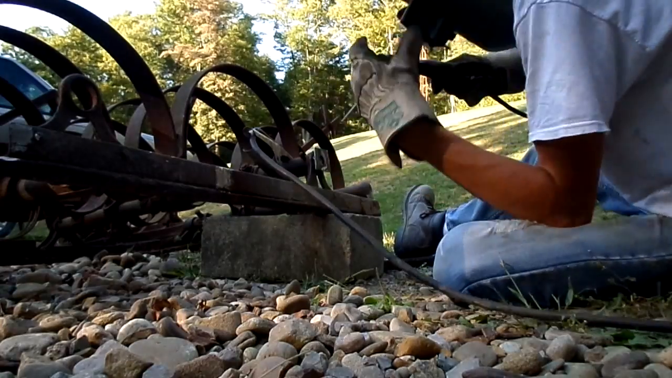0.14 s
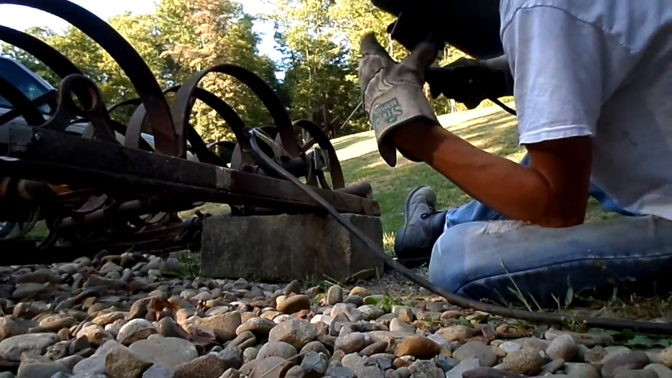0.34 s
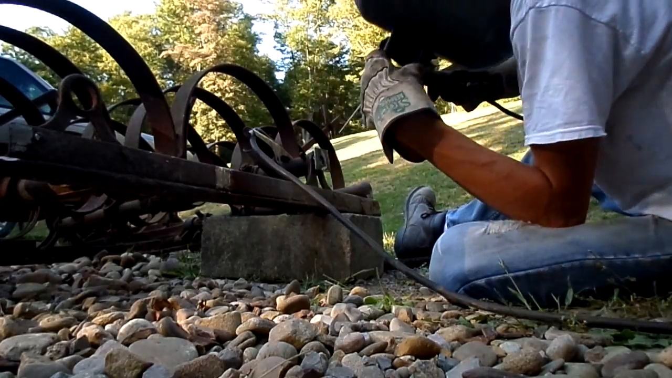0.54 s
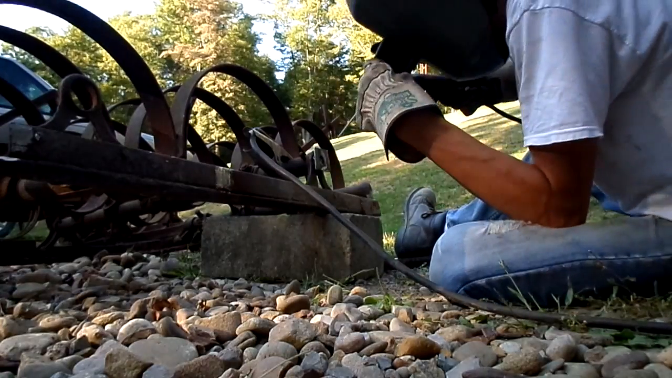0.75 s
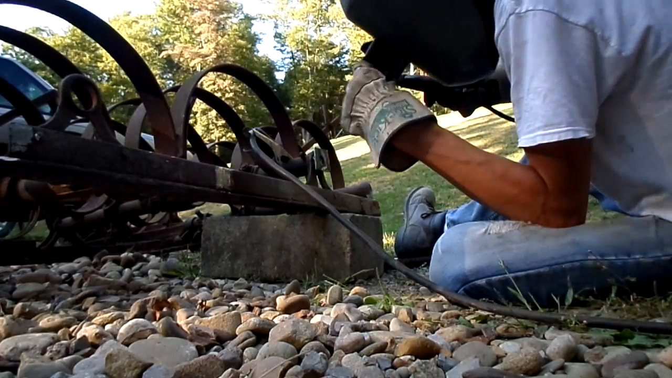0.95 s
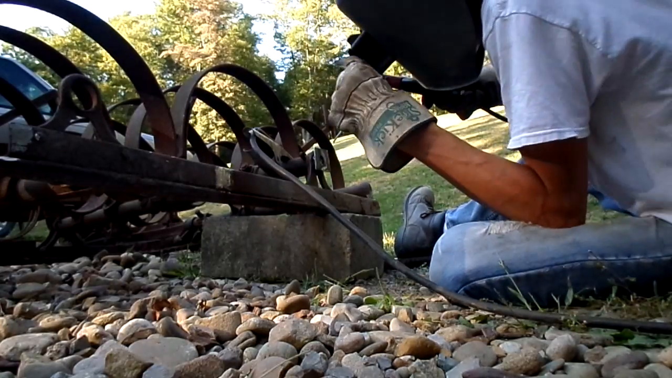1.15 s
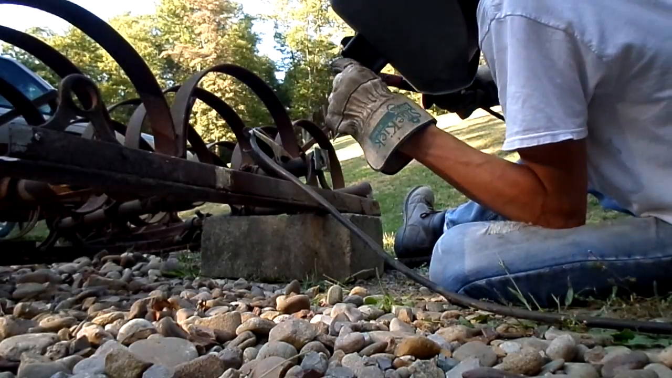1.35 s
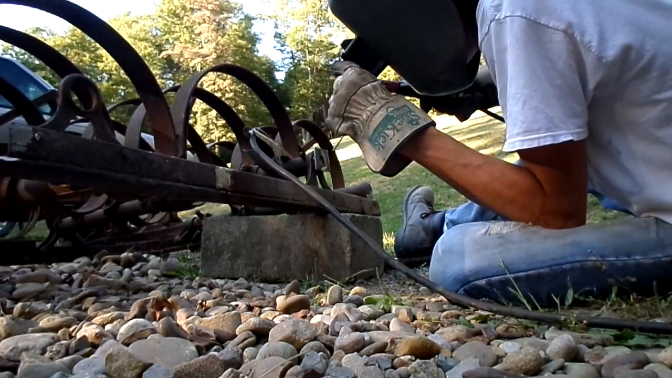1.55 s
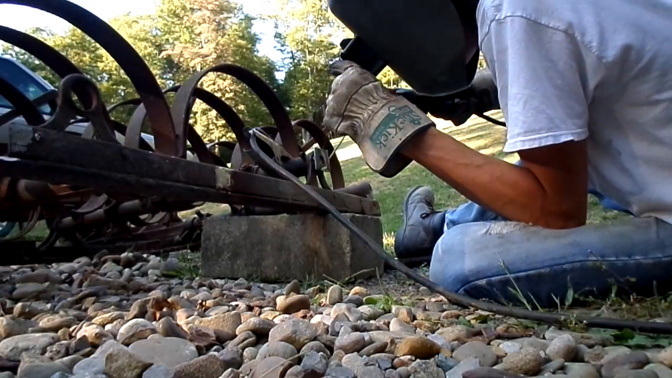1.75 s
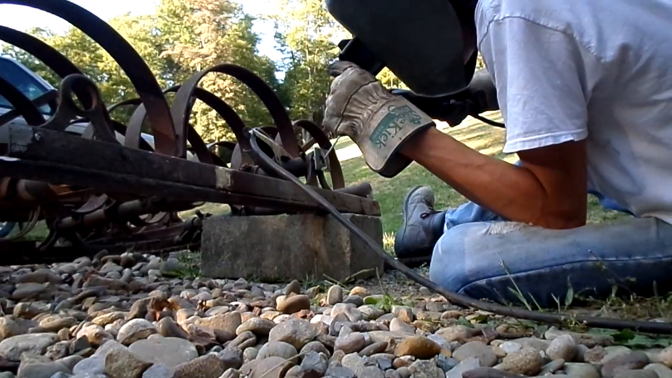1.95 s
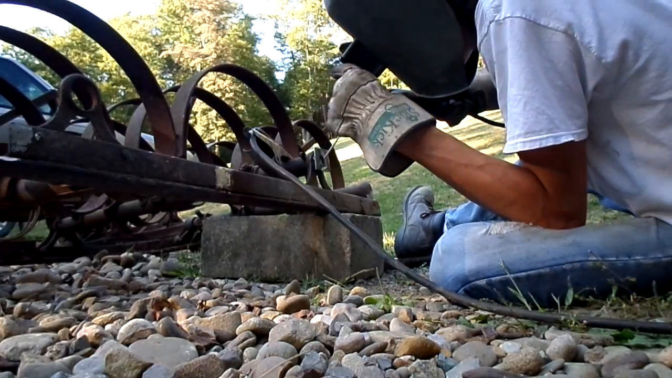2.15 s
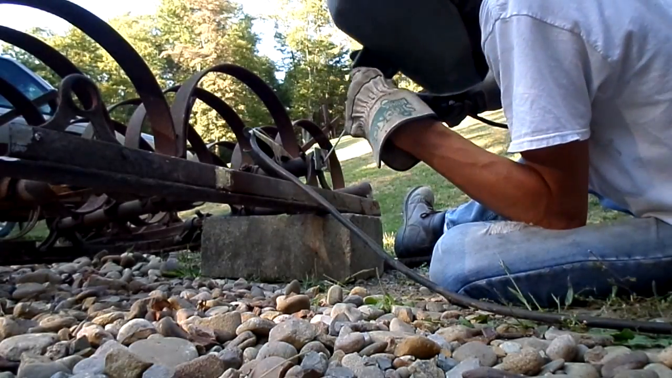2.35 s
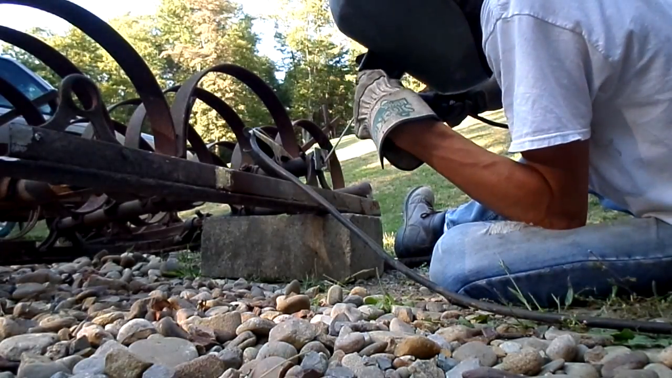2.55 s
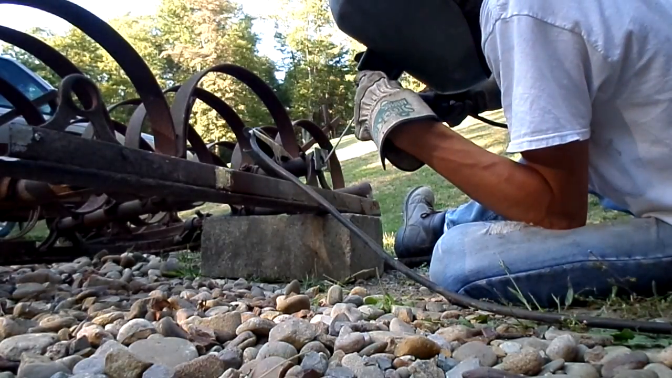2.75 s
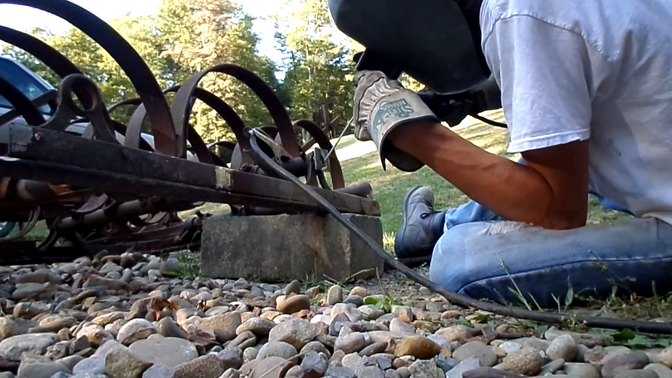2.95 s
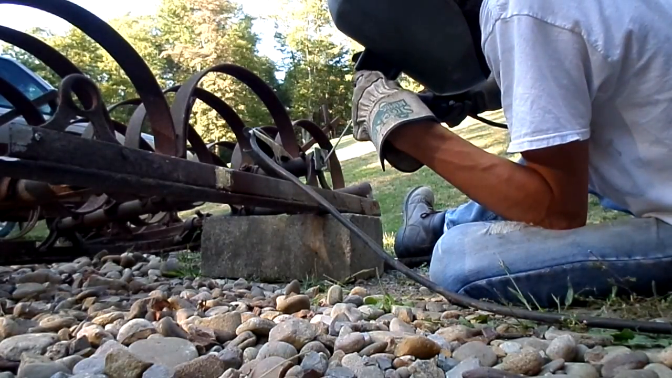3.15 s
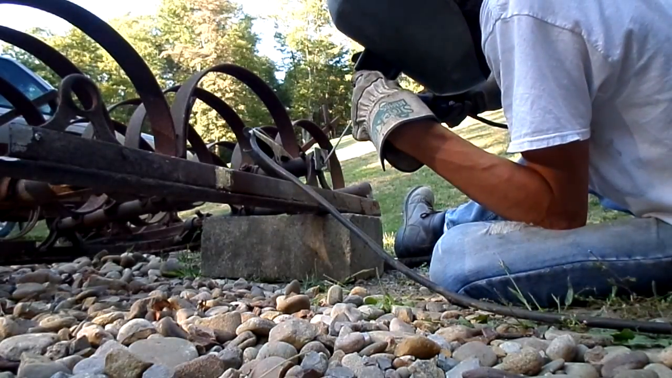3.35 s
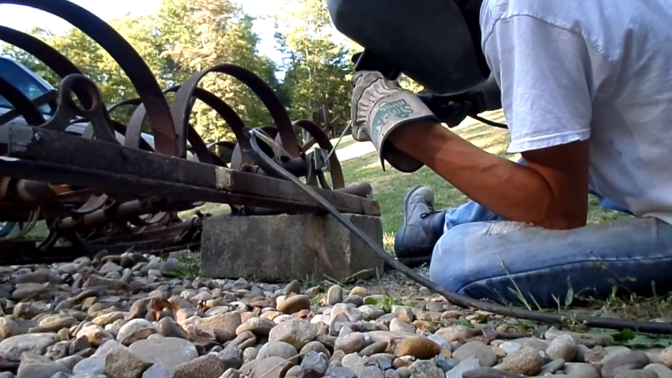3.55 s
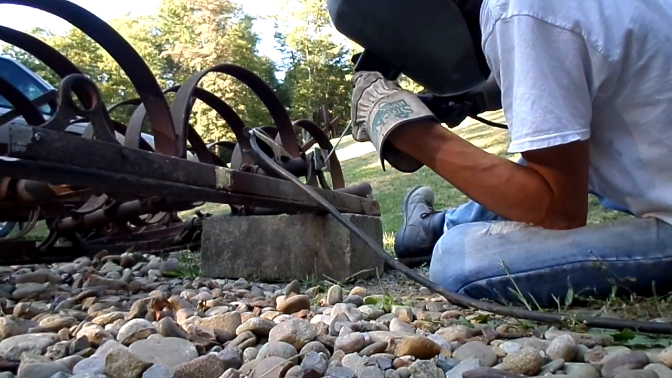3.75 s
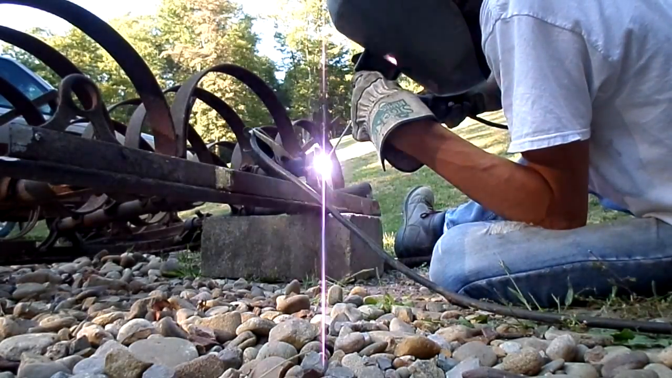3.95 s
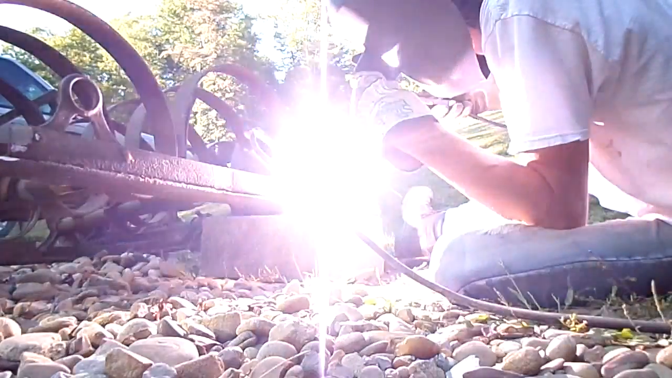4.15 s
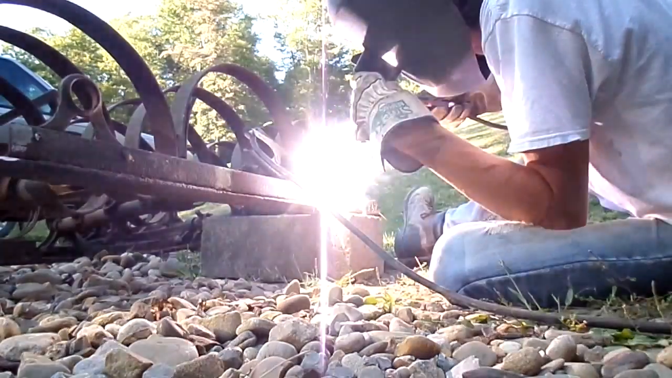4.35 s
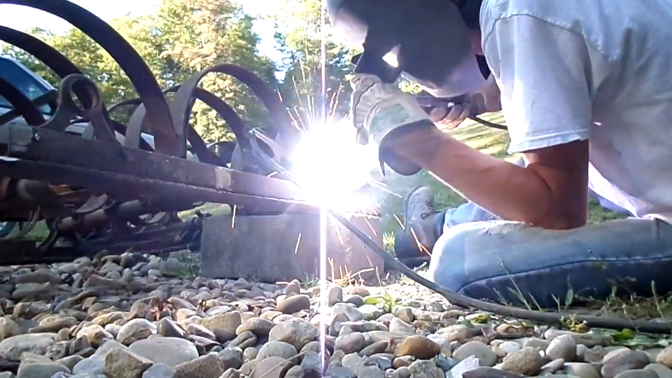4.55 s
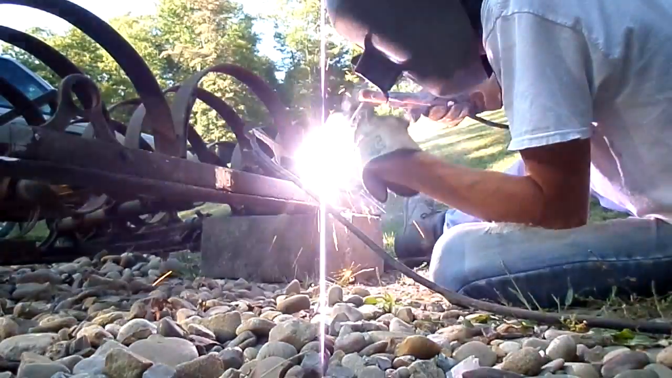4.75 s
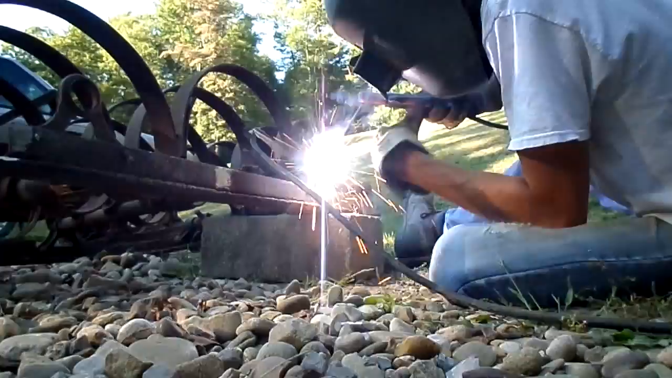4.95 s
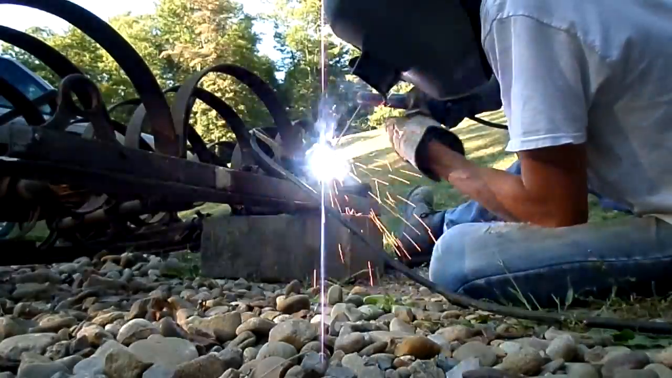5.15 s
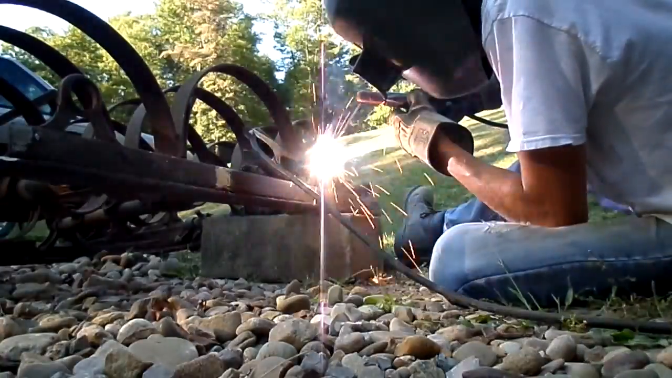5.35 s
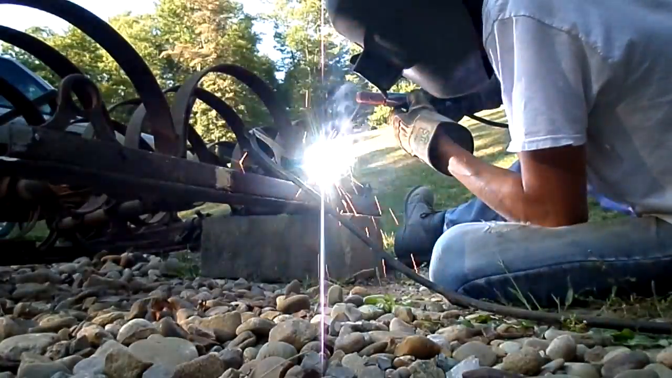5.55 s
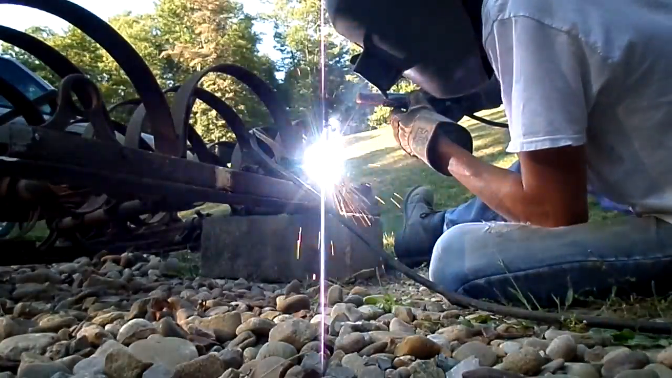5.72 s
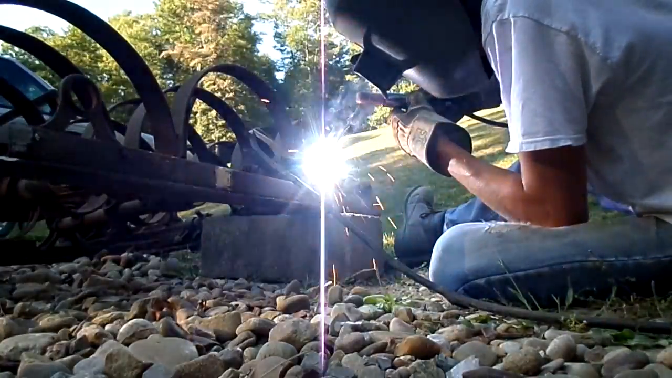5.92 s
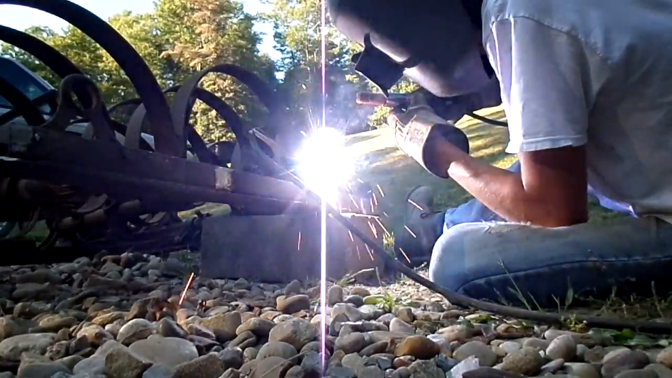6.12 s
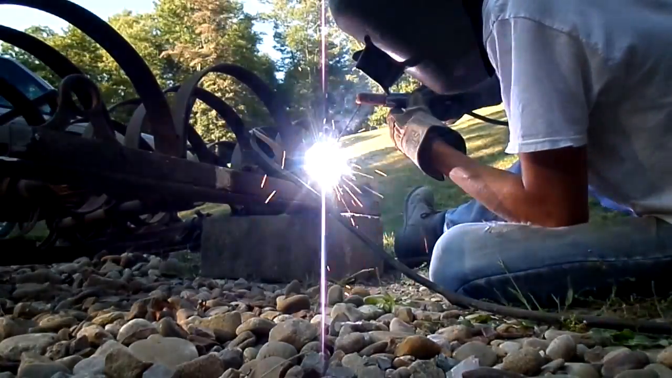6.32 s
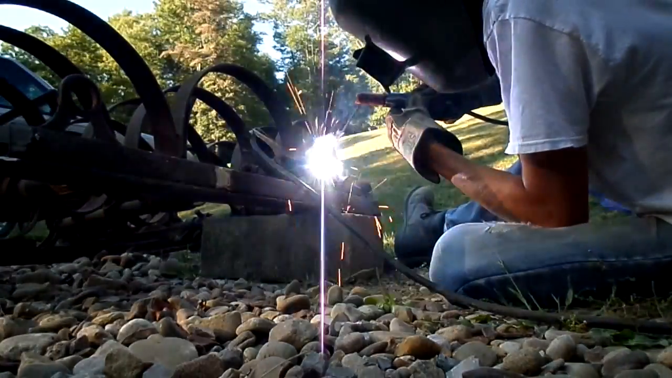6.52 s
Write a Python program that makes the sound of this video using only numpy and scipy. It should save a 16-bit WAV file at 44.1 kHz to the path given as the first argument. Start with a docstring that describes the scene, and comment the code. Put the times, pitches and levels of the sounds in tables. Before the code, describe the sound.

Outdoors, a welding machine hums steadily, small clacks and scrapes of gear, then an arc strikes and crackles harshly with loud popping spatter.

```python
"""Stick welding outdoors

Over gravel, a welder's fan and transformer hum as sums of sines in coloured noise. The worker's gear clacks,
and something drags and ticks as the worker leans in: stick-slip friction noise and damped steel modes.
The arc is struck at 4 s: noise and spits surging on every half cycle of the mains. Molten drops short it
and pop as filtered impulses with noisy tails. Gain control pushes the hum down under the loud weld."""
import sys
import numpy as np
from scipy import signal
from scipy.fft import rfft, irfft
from scipy.io import wavfile
from scipy.ndimage import uniform_filter1d, map_coordinates

SR = 44100
rng = np.random.default_rng(int(sys.argv[2]) if len(sys.argv) > 2 else 0)


def output_pcm(signal):
    """Save a mono or channel-first signal as 16-bit PCM at the path in sys.argv[1].

    Samples are clipped to [-1, 1] before scaling.
    """
    pcm = np.clip(np.atleast_2d(signal).T, -1, 1) * 32767
    wavfile.write(sys.argv[1], SR, np.round(pcm).astype(np.int16))


N = 294588
TIME = np.arange(N) / SR
PULSE_HZ = 120  # half cycles of the mains per second

# The burning arc, long at first and then held short.
# Each row: time in seconds, relative strength in dB, shortness from 0 to 1.
ARC_COURSE = [(4.15, -18, 0), (4.42, -17, 0), (4.57, -10.5, 0.57), (4.75, -16, 0.02), (4.9, -13.2, 0.24),
              (5.1, -14, 0.83), (5.3, -9, 0.71), (5.5, -11.5, 0.83), (5.95, -14, 0.75), (6.1, -11, 0.68),
              (6.3, -14.5, 1), (6.68, -13.5, 0.93)]
# Molten drops shorting the arc. Each row: time in seconds, relative level in dB,
# energy share of sharp crack against sputter from 0 to 1, level of the thud against the pop in dB.
DROPS = [(4.026, -14.5, 0.07, -25), (4.0356, -12.5, 0.23, -23), (4.0433, -8.5, 0.17, -22),
         (4.0495, -12.0, 0.85, -25), (4.0658, -16.0, 0.7, -22), (4.0837, -17.0, 0.7, -22),
         (4.1033, -16.5, 0.7, -22), (4.1102, -17.5, 0.63, -25), (4.143, -17.0, 0.2, -25),
         (4.1675, -11.0, 0.6, -20), (4.2014, -14.0, 0.41, -22), (4.2676, -15.5, 0.51, -22),
         (4.3097, -13.5, 0.52, -21), (4.3505, -15.5, 0.7, -22), (4.4246, -18.5, 0.7, -22),
         (4.4353, -6.5, 0.03, -18), (4.4426, -2.5, 0.8, -19), (4.4527, -5.5, 0.85, -11),
         (4.4696, 4.5, 0.66, -15), (4.5012, 2.0, 0.72, -19), (4.5367, 0.0, 0.62, -21),
         (4.5538, -7.0, 0.57, -20), (4.5675, -2.5, 0.4, -26), (4.584, -4.5, 0.42, -18),
         (4.6673, -8.5, 0.14, -19), (4.674, -7.5, 0.7, -22), (4.7105, -6.5, 0.85, -18),
         (4.7934, -1.0, 0.76, -15), (4.8191, -5.0, 0.4, -21), (4.8432, -8.5, 0.44, -21),
         (4.86, -7.0, 0.55, -22), (4.9269, -10.5, 0.7, -22), (4.9922, -6.0, 0.57, -22),
         (5.004, -5.0, 0.73, -18), (5.0122, -2.5, 0.74, -19), (5.069, -4.5, 0.22, -19),
         (5.119, 0.5, 0.3, -18), (5.128, -10.5, 0.45, -22), (5.133, -1.5, 0.27, -13),
         (5.136, 4.0, 0.71, -14), (5.154, 1.0, 0.75, -20), (5.1884, -8.5, 0.85, -20),
         (5.2002, -3.0, 0.25, -18), (5.2298, -7.5, 0.7, -22), (5.2362, 6.0, 0.85, -16),
         (5.252, 6.5, 0.52, -29), (5.3194, 3.5, 0.74, -19), (5.3343, -1.5, 0.7, -22),
         (5.4022, 11.5, 0.67, -18), (5.4104, 7.0, 0.85, -23), (5.4264, 9.0, 0.85, -14),
         (5.4934, 3.0, 0.76, -17), (5.553, 7.5, 0.54, -20), (5.6181, 12.5, 0.85, -15),
         (5.6865, -4.5, 0.74, -22), (5.7008, -4.0, 0.35, -22), (5.7129, -7.0, 0.7, -22),
         (5.7183, 12.5, 0.85, -12), (5.8092, 0.5, 0.85, -21), (5.8356, -7.0, 0.52, -22),
         (5.8503, 0.0, 0.4, -15), (5.859, 3.0, 0.7, -18), (5.887, -0.5, 0.85, -23), (5.903, -1.0, 0.8, -22),
         (5.9185, -2.5, 0, -23), (5.9518, -9.0, 0.37, -23), (5.9874, -5.0, 0.7, -22),
         (6.0204, -1.5, 0.7, -23), (6.026, -2.5, 0.85, -18), (6.08, -6.5, 0.44, -22),
         (6.0878, -9.0, 0.5, -22), (6.1032, -7.0, 0.5, -22), (6.1092, 6.5, 0.85, -20),
         (6.1245, -1.5, 0.8, -22), (6.2351, 0.0, 0.54, -24), (6.2504, -3.0, 0.72, -21),
         (6.2842, -7.5, 0.65, -18), (6.334, -5.0, 0.04, -22), (6.3424, 2.5, 0.79, -22),
         (6.3844, 3.0, 0.8, -20), (6.4187, 12.5, 0.82, -18), (6.4366, -9.0, 0.5, -22),
         (6.4522, -9.0, 0.5, -22), (6.5353, 6.5, 0.8, -23), (6.5683, 0.5, 0.09, -24),
         (6.5837, 1.0, 0.7, -25), (6.6011, 0.0, 0.7, -15), (6.603, 0.0, 0.5, -13), (6.6345, 4.0, 0.76, -22)]
# Spectra of a pop's bright snap and dull thud. Each row: frequency in Hz, relative level in dB per Hz.
SNAP_SPECTRUM = [(500, -28), (1900, -12), (2800, -10.5), (4200, -10.5), (5100, -2.5), (5900, -4),
                 (6800, -9), (7900, -2.5), (9800, 2.5), (10900, 3), (11600, 8.5), (12700, 2.5), (13300, 1),
                 (16500, -10), (19000, -30)]
THUD_SPECTRUM = [(40, -15), (200, 3), (600, 2), (1400, 0), (2200, 2), (3000, -12), (4000, -23), (9000, -44)]


def amp(db):
    """Level as an amplitude ratio: 20 dB is a factor of ten."""
    return 10 ** (np.asarray(db) / 20)


def evened(x):
    """Normalization to unit rms."""
    return x / np.sqrt(np.mean(x ** 2) + 1e-20)


def curve(rows, axis=1):
    """Linear interpolation of one table column in time."""
    return np.interp(TIME, np.array(rows)[:, 0], np.array(rows)[:, axis])


def add(mix, s, sound):
    """Superposition of a sound on the mix, from s seconds on."""
    part = mix[round(s * SR):][:len(sound)]
    part += sound[:len(part)]


def decay(t, t60):
    """Exponential damping: the amplitude falls by 60 dB in t60 seconds."""
    return np.exp(-np.log(1000) * t / t60)


def colour(x, points, size=4096):
    """Minimum-phase filtering: a causal response of unit energy with the given spectrum."""
    f, db = np.transpose(points)
    log_hz = np.log(abs(np.fft.fftfreq(size, 1 / SR)) + 1)
    log_gain = np.log(amp(np.interp(log_hz, np.log(f), db)))
    # the Hilbert transform of the log gain gives the phase
    spectrum = np.exp(np.conj(signal.hilbert(log_gain)))
    taps = np.fft.ifft(spectrum).real[:size // 2]
    return signal.oaconvolve(x, taps / np.linalg.norm(taps))[:N]


def drift(hz):
    """Low-pass noise: slow random variation of unit rms, up to about the given rate."""
    rolloff = (1 + (np.fft.rfftfreq(N, 1 / SR) / hz) ** 2) ** 2
    return evened(irfft(rfft(rng.standard_normal(N)) / rolloff, N))


def machine(fan_hz=52.28, waver=0.1213, flutter_db=0.3938, line_wander=0.212, air_db=-33):
    """Intermodulation: fan orders and their beats with the transformer, in a steady rush of air."""
    # Hum lines at sums of fan and mains rates.
    # Each row: multiple of fan speed, multiple of mains pulse rate, mean level in dB.
    hum_lines = [(1, 0, -77.5), (3, 0, -44.5), (4, 0, -30.5), (7, 0, -43.5), (8, 0, -39), (12, 0, -44),
                 (16, 0, -51.5), (1, 1, -48), (2, 1, -48), (3, 1, -51.5), (4, 1, -42.5), (5, 1, -54.5),
                 (1, 2, -45.5), (1, 6, -52.5)]
    # Spectrum of air rushing through the case. Each row: frequency in Hz, relative level in dB per Hz.
    air_spectrum = [(20, -29), (60, -15), (115, -13), (215, -1), (255, -6.5), (385, 4.5), (520, -4.5),
                    (780, -0.5), (1050, -19), (1500, -22.5), (6500, -25), (7500, -20), (9300, -28),
                    (11700, -23.5), (14000, -37.5), (17000, -48.5)]
    # phases in radians
    fan = 2 * np.pi * fan_hz * TIME + waver * drift(0.97)
    mains = 2 * np.pi * PULSE_HZ * TIME
    hum = np.zeros(N)
    for fan_order, mains_order, db in hum_lines:
        level = amp(db + flutter_db * drift(27))
        phase = round(fan_order) * fan + round(mains_order) * mains
        phase = phase + line_wander * drift(4.66) + 2 * np.pi * rng.random()
        hum += level * np.sqrt(2) * np.sin(phase)
    return hum + amp(air_db + .5 * drift(25.3)) * colour(rng.standard_normal(N), air_spectrum)


def transformer(strength, idle_db=-47.5, unsteady_db=2.0, full_db=-20):
    """Core vibration at the mains pulse rate: a hum when idle, a growl and overtones under welding current."""
    # Growl at full current. Each row: time in seconds, level in dB at the mains pulse rate,
    # level in dB of its octave.
    growl = [(4.2, -36, -45.5), (4.41, -38.5, -33), (4.5, -39, -44), (4.77, -37, -32.5), (4.9, -41, -44),
             (5.17, -41.5, -43.5), (5.24, -40, -27.5), (5.41, -41, -28), (5.46, -49, -44), (6.36, -46, -40),
             (6.42, -45, -30.5), (6.68, -45.5, -31)]
    # Steady overtones at full current. Each row: multiple of mains pulse rate, level in dB.
    load_lines = [(3, -51), (4, -45), (6, -50.5)]
    current = np.minimum(strength / amp(full_db), 1) * amp(unsteady_db * drift(43))
    mains = 2 * np.pi * PULSE_HZ * TIME
    overtones = np.zeros(N)
    for order, db in [(2, curve(growl, axis=2)), *load_lines]:
        overtones += amp(db) * np.sin(round(order) * mains + 2 * np.pi * rng.random())
    ground = (amp(idle_db) + current * amp(curve(growl))) * np.sin(mains)
    return np.sqrt(2) * (ground + current * overtones)


def clacks(tick_s=.002):
    """Impact excitation of the worker's gear: a short contact tick and a hollow, quickly damped ring."""
    # Hollow clacks. Each row: time in seconds, relative level in dB, contact tick in dB relative to that.
    gear_clacks = [(0.0552, -24.5, -11), (2.4288, -37.5, -18)]
    # Modes of the gear. Each row: frequency in Hz, relative level in dB, 60 dB decay time in seconds.
    gear_modes = [(495, 2, .11), (1098, -4, .1), (1290, 0, .025), (1400, 2, .02), (1510, -1, .03),
                  (1771, -12, .05), (2250, -17, .025), (3500, -20, .015), (4221, -26, .06)]
    out, t = np.zeros(N), np.arange(SR // 5) / SR
    ring = sum(amp(db) * decay(t, t60) * np.sin(2 * np.pi * hz * t) for hz, db, t60 in gear_modes)
    for s, db, tick_db in gear_clacks:
        tick = amp(tick_db) * rng.standard_normal(len(t)) * np.exp(-t / tick_s)
        add(out, s, amp(db) * (ring + tick))
    return out


def stroke(rows):
    """Amplitude envelope: strokes rise linearly, hold and die away exponentially."""
    envelope = np.zeros(N)
    for start, attack, hold, release, db in rows:
        fall_db = 60 * np.maximum(TIME - start - attack - hold, 0) / release
        envelope += amp(db - fall_db) * np.clip((TIME - start) / attack, 0, 1)
    return envelope


def drag(chatter_hz=56, chatter_db=5, grain_db=2.0, scrape_grain_db=2.0, scuff_chatter_db=1.0):
    """Stick-slip friction: grainy noise whose bright scrape chatters most."""
    # Overlapping strokes: a dull scuff, a rasp as it starts, a chattering scrape and a thin hiss.
    # Each row: start in seconds, attack in seconds, hold in seconds, release to -60 dB in seconds, level in dB.
    scuff_strokes = [(0.404, 0.0603, 0.195, 1.4138, -28.5), (1.17, 0.188, 0.037, 0.02, -44)]
    rasp_strokes = [(.42, .04, .19, .5, -42.5)]
    scrape_strokes = [(.415, 0.0182, .005, 0.103, -43.5), (.56, 0.126, 0.283, 1, -41)]
    hiss_strokes = [(.62, 0.134, 0.58, 0.63, -44)]
    # Spectra of the same four. Each row: frequency in Hz, relative level in dB per Hz.
    scuff_spectrum = [(40, -24), (120, 2.5), (300, -0.5), (540, 7.5), (850, -16), (1220, 2), (1600, -13),
                      (2050, -17), (2600, -27.5), (8000, -22.5), (16000, -40.5)]
    rasp_spectrum = [(700, -30), (1250, -2), (1600, 0), (2100, -1), (2500, -19), (8000, -35)]
    scrape_spectrum = [(1500, -22.5), (3700, -12), (4600, -5.5), (6100, 1), (7400, 2), (8500, -17.5),
                       (9700, -9.5), (11900, -0.5), (13500, -16), (17000, -39.5)]
    hiss_spectrum = [(600, -3.5), (1250, 5.5), (1650, -24), (3700, -13.5), (4500, 1), (5500, -11.5),
                     (12000, -18.5), (17000, -42.5)]

    def grains(grain_level_db):
        return evened(rng.standard_normal(N) * amp(grain_level_db))

    slips = np.cos(2 * np.pi * np.cumsum(chatter_hz * (1 + 0.137 * drift(14.0))) / SR)
    scuff = grains(scuff_chatter_db * slips + grain_db * drift(116))
    rasp = grains(grain_db * drift(116))
    scrape = grains(chatter_db * slips + scrape_grain_db * drift(300))
    hiss = grains(grain_db * drift(110))
    return (colour(scuff * stroke(scuff_strokes), scuff_spectrum)
            + colour(rasp * stroke(rasp_strokes), rasp_spectrum)
            + colour(scrape * stroke(scrape_strokes), scrape_spectrum)
            + colour(hiss * stroke(hiss_strokes), hiss_spectrum))


def knocks(tick_db=-3, tick_s=0.00975):
    """Modal excitation: a short rattle of contact and the ring of steel, coloured by where each knock lands."""
    # Small knocks and catches of the rod on steel. Each row: time in seconds, relative level in dB,
    # pitch that rings most in Hz, fall away from it in dB per octave, strength of the ring in dB.
    rod_knocks = [(0.428, -28.5, 4400, 7.5, -6.5), (0.582, -15.5, 1220, 19.5, -7),
                  (0.651, -19.5, 1210, 20, -8.5), (0.74, -22, 1240, 23.5, -9.5),
                  (1.36, -25, 1270, 22, -8.5), (2.129, -8, 2930, 7, -1), (2.1893, -14, 2500, 14.5, -4)]
    # Modes of the steel. Each row: frequency in Hz, relative level in dB, 60 dB decay time in seconds.
    steel_modes = [(514, 1.5, 0.088), (1100, -8.5, 0.107), (1300, 2.5, 0.073), (1465, -1, 0.043),
                   (1928, -4.5, 0.0344), (2202, -4.5, 0.04), (3145, -12, 0.0594), (4450, -9, 0.029),
                   (4895, -1.5, 0.0374), (5880, -8.5, 0.134), (8210, -2.5, 0.037), (8970, -9, 0.12),
                   (9835, -15, 0.128), (10600, 3, 0.0164), (11390, 1.5, 0.018)]
    out, t = np.zeros(N), np.arange(SR // 4) / SR
    hz_axis = np.fft.rfftfreq(len(t), 1 / SR) + 1
    for s, db, centre_hz, fall_db, ring_db in rod_knocks:
        ring = sum(amp(mode_db) * decay(t, t60) * np.sin(2 * np.pi * (hz * t + rng.random()))
                   for hz, mode_db, t60 in steel_modes)
        tick = amp(tick_db) * rng.standard_normal(len(t)) * np.exp(-t / tick_s)
        tilt = amp(-fall_db * abs(np.log2(hz_axis / centre_hz)))
        blow = irfft(rfft(amp(ring_db) * ring + tick) * tilt, len(t))
        add(out, s, amp(db) * blow[:len(t) // 2] / 2)
    return out


def burning(strike_s=4.003, catch_s=0.0122, flare_db=2.5, flare_s=0.05, unsteady_db=.5, unsteady_hz=25):
    """Amplitude modulation: the arc catches, flares, wavers with the hand and now and then falters or goes out."""
    # Moments of faltering. Each row: start in seconds, length in seconds, level change in dB.
    outages = [(5.023, 0.027, -14.5), (5.05, .01, -7), (5.078, .034, -5), (5.164, 0.023, -13),
               (5.44, .048, -3), (5.873, .04, -5), (6.393, .018, -7)]
    age = np.maximum(TIME - strike_s, 0)
    flare = flare_db * age / flare_s * np.exp(1 - age / flare_s)
    steps_db = sum(db * ((TIME > s) & (TIME < s + length)) for s, length, db in outages) * 1.
    out_db = uniform_filter1d(steps_db, size=256)  # softens the edges
    level_db = curve(ARC_COURSE) + flare + out_db + unsteady_db * drift(unsteady_hz)
    return np.minimum(age / catch_s, 1) * amp(level_db)


def quench(depth_db=-3, short_s=0.0048):
    """Short-circuiting: just before it bursts, a drop bridges the gap and the arc falters."""
    bridged = sum(np.exp(-((TIME - s + short_s / 2) / (short_s / 2)) ** 2) for s, *_ in DROPS)
    return amp(depth_db * np.minimum(bridged, 1))


def wandering_delay(x):
    """Delay modulation: a slight random delay softens the arc's narrow resonances."""
    slide = .006 * drift(50)
    # a leaky sum of the slide gives the lead in samples
    lead = signal.lfilter([1], [1, -np.exp(-2 * np.pi * 20 / SR)], slide)
    return map_coordinates(x, [np.arange(N) + lead], order=5)


def arc(strength, short, peak_turn=0.18, pulse_db=4.9, point_db=0.87, long_luck_db=1.5, short_luck_db=2.3,
        long_spits_per_s=2400, short_spits_per_s=750, spit_spread_db=2.5, hiss_db=-5):
    """Current-modulated noise: hiss and tiny spits surge each half cycle, evenly if long, fitfully if short."""
    # Spectra of the arc while long and flaring, and once held short.
    # Each row: frequency in Hz, relative level in dB per Hz.
    long_spectrum = [(100, -12.5), (600, -6.5), (1400, -13), (1950, -22.5), (2600, -5.5), (3570, -9.5),
                     (5030, -1), (6760, -11), (7840, -.5), (8640, -10), (9660, 0), (11200, -1.3),
                     (14300, -9), (17000, -24), (19000, -40.5)]
    short_spectrum = [(100, -14), (900, -29), (2100, -23.5), (2900, -14.5), (3440, -12), (5030, -4),
                      (5900, -2.5), (6800, -16), (7850, 1), (8700, -5), (9500, 5), (10100, 6), (10700, -4),
                      (11300, 8), (12500, 7), (13200, -5), (14000, -1.5), (16800, -8), (19000, -45)]
    turns = PULSE_HZ * TIME - peak_turn
    # one random level for each half cycle
    luck = np.clip(rng.standard_normal(N), -2, 2)[np.round(turns).astype(int)]
    luck_db = luck * (long_luck_db + short * (short_luck_db - long_luck_db))
    swing_db = pulse_db * np.cos(2 * np.pi * turns) + point_db * np.cos(2 * np.pi * 2 * turns)
    surge = evened(amp(swing_db + luck_db))
    rate = long_spits_per_s + short * (short_spits_per_s - long_spits_per_s)
    sizes = amp(spit_spread_db * np.minimum(rng.exponential(1, N), 4))
    spits = (rng.random(N) < rate / SR) * sizes / np.sqrt(rate)
    spits = evened(spits * rng.choice([-1, 1], N))
    fizz = evened(surge * (spits + amp(hiss_db) * rng.standard_normal(N)))
    fizz = fizz * strength * quench()
    return wandering_delay(colour(fizz * (1 - short), long_spectrum) + colour(fizz * short, short_spectrum))


def pops(snap_db=.5, thud_db=0, sputter_s=0.00199, bounce_s=.00046, bounce_spread=.06, bounce=.35):
    """Impulsive radiation and reflection: a drop bursts in a crack and thud, with brief sputter.
    The crack bounces off the gravel below, a little differently each time, which varies its colour."""
    snap, thud, t = np.zeros(N), np.zeros(N), np.arange(SR // 100) / SR
    unit = np.sqrt(.005 * SR)  # energy of unit rms over 5 ms
    impulse = t == 0
    for s, db, share, low_db in DROPS:
        share = np.clip(share, 0, 1)
        sputter = rng.standard_normal(len(t)) * np.exp(-t / sputter_s) * (t > 0)
        spray = np.sqrt(1 - share) * sputter / np.linalg.norm(sputter)
        lag = round(bounce_s * SR * (1 + bounce_spread * rng.uniform(-1, 1)))
        crack = impulse - bounce * rng.uniform(.4, 1.6) * np.roll(impulse, lag)
        crack = np.sqrt(share) * crack / np.linalg.norm(crack)
        add(snap, s, unit * amp(db + snap_db) * (crack + spray))
        add(thud, s, unit * amp(db + thud_db + low_db) * (np.sqrt(share) * impulse + spray))
    return colour(snap, SNAP_SPECTRUM) + colour(thud, THUD_SPECTRUM)


def spatter(strength, per_s=30, level_db=-10.0, spread_db=2.0, thud_db=-17):
    """Random point process: smaller droplets snap by chance, mostly while the current peaks."""
    chance = per_s / SR * (1 + np.cos(2 * np.pi * (PULSE_HZ * TIME - .2)))
    sizes = amp(level_db + spread_db * np.minimum(rng.exponential(1, N), 3)) * np.sqrt(SR / PULSE_HZ)
    drops = (rng.random(N) < chance) * sizes * strength
    return colour(drops, SNAP_SPECTRUM) + amp(thud_db) * colour(drops, THUD_SPECTRUM)


def echoes(x, t60, wet_db, shift_hz=3, size=8000):
    """Diffuse scattering: a dense spray of dying reflections, which shifts as the rod and the worker move."""
    t, turn = np.arange(size) / SR, 2 * np.pi * shift_hz * TIME
    taps = rng.standard_normal((3, size)) * decay(t, t60) * (t > .0005)
    paths = signal.oaconvolve(x[None], taps / np.linalg.norm(taps), axes=1)[:, :N]
    # three sets of reflections take turns
    offsets = np.arange(len(paths))[:, None] * np.pi / len(paths)
    shares = np.sqrt(2) * np.cos(turn + offsets)
    return x + amp(wet_db) * (paths * shares).sum(0)


def scene():
    """Early scattering: steel frame and gravel return the weld at once, the open yard very little."""
    strength, short = burning(), np.clip(curve(ARC_COURSE, axis=2), 0, 1)
    crackle = echoes(arc(strength, short), t60=.011, wet_db=-7, shift_hz=5)
    bursts = echoes(pops() + spatter(strength), t60=.016, wet_db=-9, shift_hz=4)
    weld = echoes(crackle + bursts + knocks() + clacks(), t60=.15, wet_db=-29)
    return (weld + machine() + transformer(strength) + drag())[None]


def gain_control(x, limit=0.178, attack=230, hold_s=0.0352, recover_db=18.0, size=64):
    """Feedback compression: output peaks over the limit wind the gain down; it creeps back in dB per second."""
    step, held, duck_db, ducks = size / SR, 0, 0, []
    for peak in abs(x[:N // size * size]).reshape(-1, size).max(1):
        held = max(min(peak * amp(-duck_db), 1), held * np.exp(-step / hold_s))
        # attack: dB per second for each unit of excess
        duck_db = max(0, duck_db + step * (attack * max(held - limit, 0) - recover_db))
        ducks.append(duck_db)
    return x * amp(-np.interp(TIME, np.arange(len(ducks)) * step, ducks))


def record(dry, edge_hz=17200):
    """Compression, clipping of peaks beyond full scale, and low-pass band limiting."""
    out = np.clip(gain_control(dry[0]), -1, 1)
    low_pass = signal.firwin(511, edge_hz, window=("kaiser", 9), fs=SR)
    return signal.oaconvolve(out, low_pass, "same")[None]


dry = scene()
out = record(dry)
output_pcm(out)
```